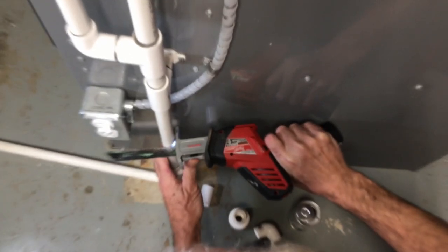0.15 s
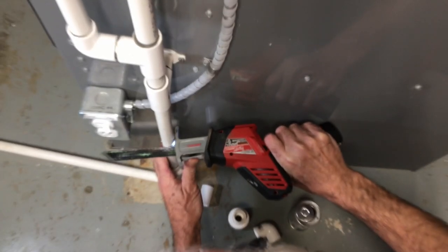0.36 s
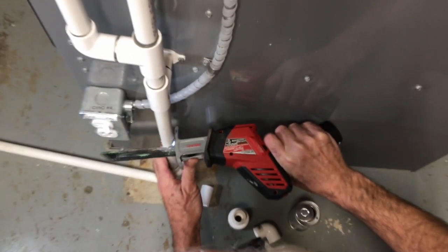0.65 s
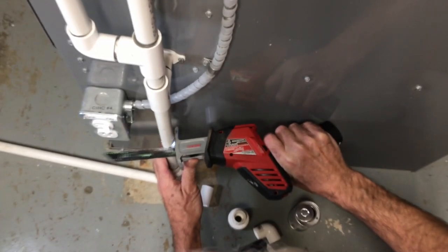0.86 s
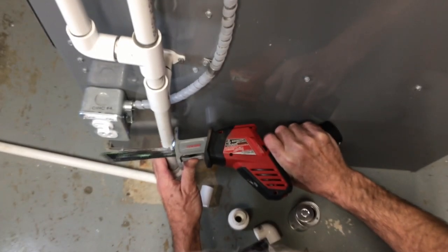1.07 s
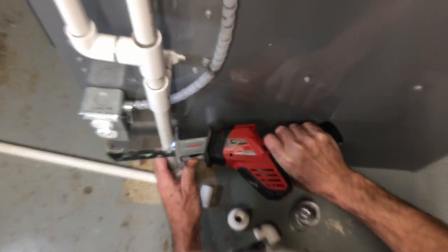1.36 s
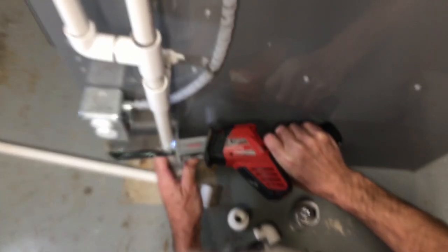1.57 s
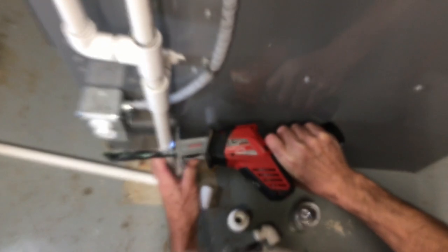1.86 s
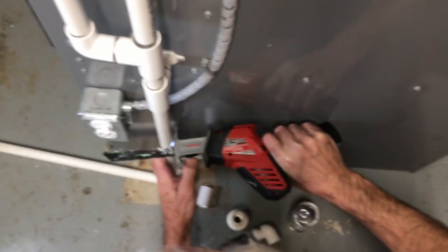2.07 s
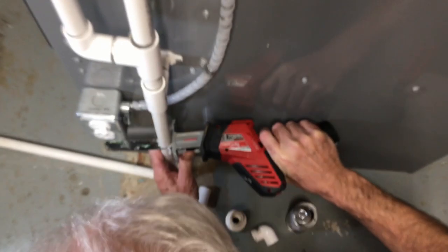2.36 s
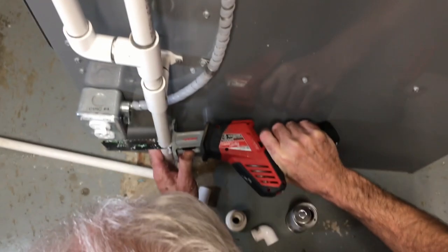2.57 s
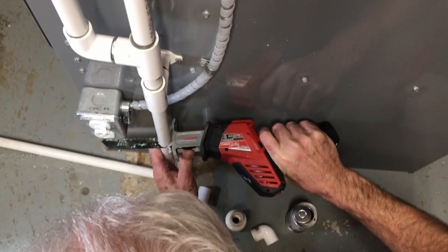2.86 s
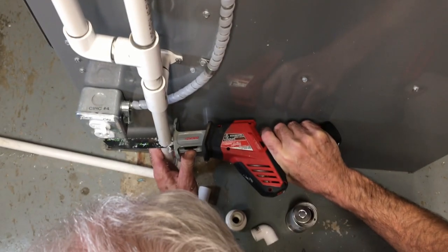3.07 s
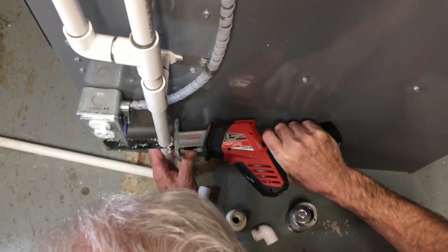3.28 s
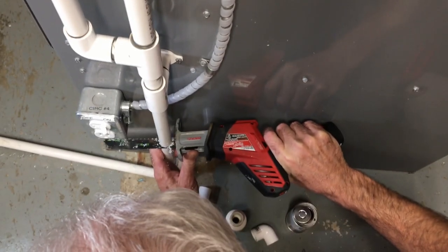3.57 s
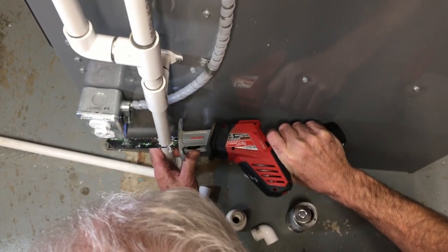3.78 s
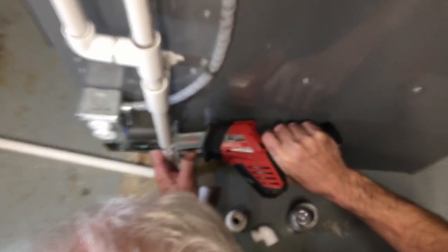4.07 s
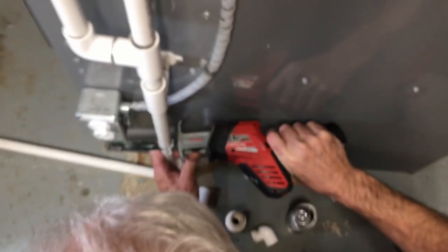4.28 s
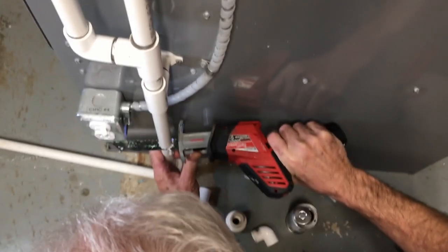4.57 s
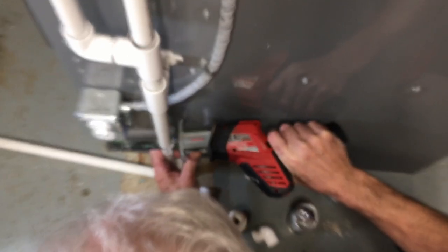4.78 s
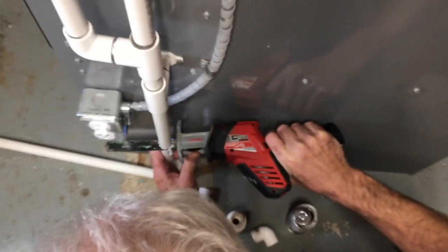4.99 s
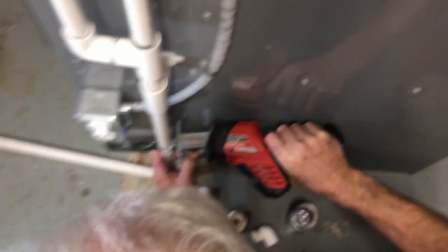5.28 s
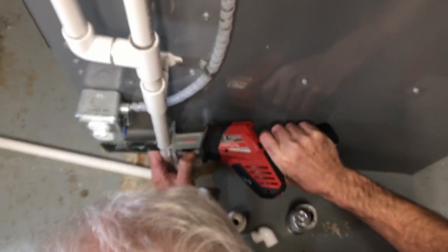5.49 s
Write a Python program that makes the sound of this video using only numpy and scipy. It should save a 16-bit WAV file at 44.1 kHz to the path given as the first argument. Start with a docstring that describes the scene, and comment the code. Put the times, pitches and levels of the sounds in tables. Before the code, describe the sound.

After a thin electric whine and a clack, a cordless reciprocating saw speeds up and cuts a plastic pipe for about two seconds, then makes four short bursts. Gears rattle, the blade rasps, squeals and knocks rapidly, the hollow pipe honks and a sheet-metal cabinet booms low. In the pauses come faint trigger clicks, blade bumps and brief whines. It sounds close, in a small hard room.

```python
"""A thin whine and a clack, then a cordless reciprocating saw speeds up and cuts a plastic pipe:
one long run, then four short bursts, beside a sheet-metal cabinet in a small hard room.
Gears rattle, the blade rasps, squeals and knocks at each reversal, the pipe honks, the cabinet booms.
The speed controller whines when the motor crawls, and the drive clacks as it takes up its slack.
Between runs the trigger clicks and the resting blade slides in the slot and bumps the pipe."""
import sys
import numpy as np
from scipy import signal
from scipy.fft import rfft, irfft
from scipy.io import wavfile

SR = 44100
rng = np.random.default_rng(int(sys.argv[2]) if len(sys.argv) > 2 else 0)


def store_wav(level_fs):
    """Save 16-bit WAV to argv[1]."""
    pcm = np.round(np.clip(np.atleast_2d(level_fs), -1, 1) * 32767)
    wavfile.write(sys.argv[1], SR, pcm.T.astype(np.int16))


N = 248283
T = np.arange(N) / SR


def from_db(db):
    """Decibels to gain."""
    return 10 ** (np.asarray(db) / 20)


def unit_rms(x, where=slice(None)):
    """Scales to rms 1 over the chosen samples."""
    return x / np.sqrt(np.mean(x[where] ** 2) + 1e-20)


def at_hz(points, hz):
    """Reads a table on a log-frequency axis."""
    points = np.array(points)
    return np.interp(np.log(np.maximum(hz, 1)), np.log(points[:, 0]), points[:, 1])


def noise():
    """Fresh white noise."""
    return rng.standard_normal(N)


def convolve(x, response):
    """Plays a sound through an impulse response."""
    return signal.fftconvolve(x, response)[:N]


def colour(x, spectrum, modes=(), size=8192):
    """Body filter of unit energy: a smooth spectrum plus resonances, rolled off below its first point."""
    hz = np.fft.rfftfreq(size, 1 / SR)
    db = at_hz(spectrum, hz) - 10 * np.log10(1 + (spectrum[0][0] / (hz + 1)) ** 4)
    for centre_hz, width_hz, lift_db in modes:
        db = db + lift_db / (1 + (2 * (hz - centre_hz) / width_hz) ** 2)
    cepstrum = irfft(np.log(from_db(db)))
    cepstrum[1:size // 2] *= 2  # fold to minimum phase
    cepstrum[size // 2 + 1:] = 0
    response = irfft(np.exp(rfft(cepstrum)))
    return convolve(x, response / np.linalg.norm(response))


def fade(clicks, decay_s):
    """Each click starts an exponential decay of its own height."""
    return signal.lfilter([1], [1, -np.exp(-1 / (decay_s * SR))], clicks + 1e-18)


def lag(x, lag_s):
    """One-pole smoothing at unity gain."""
    return fade(x, lag_s) / (lag_s * SR)


def wobble(drift_s):
    """Random drift of rms 1."""
    return unit_rms(fade(noise(), drift_s))


def passes(phase, spread_db):
    """A click of uneven strength each time the phase passes a whole number."""
    crossed = np.diff(np.floor(phase), prepend=np.floor(phase[0])) > 0
    return crossed * from_db(spread_db * np.clip(noise(), -2, 2))


def gates(rows, edge_s):
    """Soft-edged gain from rows of start_s, end_s, level_db."""
    return sum(from_db(db) * np.clip(np.minimum(T - start, end - T) / edge_s + .5, 0, 1)
               for start, end, db in rows)


# Trigger pulls: press_s, squeeze_s, rise_s, ease_s, release_s, top_speed_hz, crank_start_turns,
# drive_db, pipe_db, bite_share
PULLS = [(0, .1, .006, 1.799, 2.04, 17.76, .075, -29.4, -31.7, .92),
         (2.314, 2.314, .001, 2.333, 2.428, 26.2, .63, -26.5, -33.5, .35),
         (3.92, 3.953, .01, 4.145, 4.335, 24.26, .934, -28.2, -31.3, .25),
         (4.612, 4.612, .022, 4.792, 4.945, 23.67, .935, -29.5, -32.7, .08),
         (5.0, 5.035, .088, 5.335, 5.512, 19.1, .18, -29.9, -30.5, .35)]

def trigger():
    """Trigger travel, 0-1: barely pressed, squeezed home, held, eased back, released."""
    return sum(np.interp(T, [squeeze_s, squeeze_s + rise_s, ease_s, release_s],
                         [CRAWL_SHARE, 1, 1, CRAWL_SHARE]) * (T >= press_s) * (T < release_s)
               for press_s, squeeze_s, rise_s, ease_s, release_s, *_ in PULLS)


def latest_pull(name):
    """One column of the latest trigger pull, per sample."""
    names = ["press_s", "squeeze_s", "rise_s", "ease_s", "release_s", "top_speed_hz",
             "crank_start_turns", "drive_db", "pipe_db", "bite_share"]
    columns = dict(zip(names, np.transpose(PULLS)))
    return columns[name][np.maximum(np.searchsorted(columns["press_s"], T, "right") - 1, 0)]


CRAWL_SHARE, FULL_BATTERY_SPEED_HZ = .24, 26.5

def motor(inertia_s=.0323, sag_per_s=.0102):
    """Follows the trigger with inertia and slows under load; pace is its share of top speed."""
    press_s = latest_pull("press_s")
    pace = lag(trigger(), inertia_s)
    speed_hz = pace * latest_pull("top_speed_hz") * (1 - sag_per_s * (T - press_s))
    turns = np.cumsum(speed_hz) / SR
    crank_turns = latest_pull("crank_start_turns") + turns - np.interp(press_s, T, turns)
    return pace, speed_hz, crank_turns


# Brief controller whines, lingering as the motor coasts or sounding alone: start_s, end_s, level_db
WHINE_SPANS = [(2.03, 2.074, -49), (3.335, 3.378, -52.5), (4.945, 5.0, -49), (5.61, 5.64, -50)]
# Whine partials: harmonic_number, level_db
WHINE_PARTIALS = [(1, -7), (2, -2), (3, -2), (4, -11), (5, -12), (6, -12), (7, -12)]

def whine(switching_hz=1997.5):
    """Chopped battery current makes the windings sing, most with the trigger barely pressed."""
    duty = np.clip(trigger() * latest_pull("top_speed_hz") / FULL_BATTERY_SPEED_HZ, 0, 1)
    level = from_db(-47.5) * (duty > 0) * (1 - duty) ** .7 + gates(WHINE_SPANS, edge_s=.01)
    phase = 2 * np.pi * switching_hz * T + .11 * wobble(.012)
    partials = sum(from_db(db + 2.1 * wobble(.015)) * np.sin(harmonic * phase)
                   for harmonic, db in WHINE_PARTIALS)
    return lag(level, .012) * partials


# Background air: freq_hz, density_db
AIR_SPECTRUM = [(12, -20), (20, -4), (182, 0), (388, -15), (698, -9), (1150, -23.5), (1910, -23),
                (2390, -26.5), (6010, -25), (7520, -24), (16000, -26)]

def air():
    """Faint, steady, low air noise."""
    return from_db(-73.5) * colour(noise(), AIR_SPECTRUM)


# Saw resonances: centre_hz, width_hz, lift_db
SAW_MODES = [(1254.5, 16, 10.5), (1490, 49, 4.5), (2058, 80, 4.5), (3740, 260, 1.5), (4710, 58, 4.5),
             (5370, 44, 4.5), (5400, 74, 2.5), (13300, 200, -0.5)]
# Gear rattle: freq_hz, density_db
GEAR_SPECTRUM = [(650, -40), (1100, -10), (1240, -4), (1540, -12), (2040, 0.5), (2250, -15), (2920, -6),
                 (3260, -18.5), (3770, -6), (4130, -11), (4670, -6), (5770, -18.5), (6830, -9),
                 (12200, -11), (16000, -24)]

def gear_rattle(mesh, running):
    """Each gear mesh sends a tiny burst through the saw's body."""
    return unit_rms(colour(noise() * (mesh + .4), GEAR_SPECTRUM, SAW_MODES), running)


# Teeth on plastic: freq_hz, density_db
TEETH_SPECTRUM = [(650, -24.5), (1100, -4.5), (1350, -3), (1930, 0.5), (2250, -10), (2550, -0.5),
                  (3190, -17.5), (3810, -1), (4170, -7), (5580, -3.5), (6910, -11), (9240, -8.5),
                  (11200, -5.5), (13700, -11.5), (16000, -25.5)]

def teeth_rasp(stroke, running):
    """Teeth tear off chips, most in mid-stroke."""
    chips = noise() * from_db(1.9 * noise()) * (.71 + .25 * np.abs(stroke))
    return unit_rms(colour(chips, TEETH_SPECTRUM, SAW_MODES), running)


# Pipe honk: freq_hz, density_db
HONK_SPECTRUM = [(330, -20.5), (430, -5), (480, -4), (560, 0), (680, -2), (930, 0), (1050, -4.5),
                 (1200, -17.5), (1700, -43)]
# Pipe resonances: centre_hz, width_hz, lift_db
PIPE_MODES = [(440, 21, 4.3), (565, 40, 6.5), (790, 63, 3.6), (893, 17, 1.5)]
# Pipe growl: freq_hz, density_db
GROWL_SPECTRUM = [(240, -12), (300, -1), (350, -1), (400, -16), (700, -42)]

def pipe_honk(mesh, knocks, bite, running):
    """The hollow pipe honks with the rasp and the jolts, and growls when the teeth bite."""
    jolts = unit_rms(noise() * fade(knocks, .0066), running)
    shaking = noise() * (mesh + 1.2) + .46 * jolts
    honk = unit_rms(colour(shaking, HONK_SPECTRUM, PIPE_MODES), running)
    growl = unit_rms(colour(jolts + .6 * noise(), GROWL_SPECTRUM), running)
    return from_db(-.09) * honk + from_db(-8) * bite * growl


# Cabinet boom: freq_hz, density_db
CABINET_SPECTRUM = [(20, -5.5), (34, -8), (48, -12.5), (75, -9.5), (105, -2.5), (130, -2.5), (160, -1),
                    (205, -1), (290, -2.5), (380, -14), (550, -44)]
# Sheet-metal resonances: centre_hz, width_hz, lift_db
CABINET_MODES = [(164.8, 14, 5.7), (255.7, 9.8, 5), (282, 6.2, 2.65)]

def cabinet_boom(reversals, running):
    """Every blade reversal shoves the sheet metal."""
    shudder = unit_rms(noise() * fade(reversals, .011), running)
    shoves = unit_rms(reversals, running) + 1.06 * shudder + .5 * noise()
    return from_db(-5) * unit_rms(colour(shoves, CABINET_SPECTRUM, CABINET_MODES), running)


# Cabinet thump: freq_hz, density_db
THUMP_SPECTRUM = [(25, -22.5), (60, -6.5), (110, -2.5), (165, 2.5), (260, -5.5), (350, -21), (600, -3),
                  (900, -40)]

def thump(clicks, decay_s):
    """The cabinet answers a contact with a low thud."""
    return colour(noise() * fade(clicks, decay_s), THUMP_SPECTRUM)


def contacts(rows, spectrum, decay_s, split_hz, thump_decay_s):
    """Short crunches, with separate levels below and above the split, that thump the cabinet."""
    start_s, db, treble_db, thump_db = np.transpose(rows)
    clicks = np.zeros((3, N))
    clicks[:, np.round(start_s * SR).astype(int)] = from_db([db, db + treble_db, db + thump_db])
    body, treble = (colour(noise() * fade(c, decay_s), spectrum) for c in clicks[:2])
    body = signal.sosfilt(signal.butter(3, split_hz, "low", fs=SR, output="sos"), body)
    treble = signal.sosfilt(signal.butter(3, split_hz, "high", fs=SR, output="sos"), treble)
    return body + treble + from_db(-6.5) * thump(clicks[2], thump_decay_s)


# Drive clacks and single loud blade-reversal knocks: start_s, level_db, treble_offset_db, thump_offset_db
CLACKS = [(.0505, -32, -21, -5), (.124, -35, 6, -4), (1.296, -30, 6, -14), (1.901, -27, 5, -12),
          (1.9075, -21, 3, -1.5), (2.3155, -13, -1, -6), (2.344, -21, 1.5, -10), (2.455, -26.5, -5, -14),
          (3.3085, -19.7, -3, -12), (3.333, -35, -2.5, -2), (3.596, -43.5, -17, -9), (3.928, -25, -7, -14),
          (3.967, -34, -2, 4), (4.063, -21.5, -4, -3.5), (4.6135, -17.5, -6, -11), (5.0035, -28, -2, -5.5),
          (5.083, -29, 1, -6), (5.183, -23, 5, -1), (5.528, -22, 2, -1), (5.615, -30.5, -8, -16)]
# One clack: freq_hz, density_db
CLACK_SPECTRUM = [(100, -11.5), (300, 2.5), (420, -2), (750, 6), (1300, -6), (1950, 2.5), (2400, -5),
                  (3000, 1.5), (4000, -4.5), (5500, -9), (7000, -5.5), (11000, -2), (16000, -12.5)]

def clacks():
    """The drive clacks as it takes up its slack, and now and then a blade reversal knocks out loud."""
    return contacts(CLACKS, CLACK_SPECTRUM, decay_s=.006, split_hz=4300, thump_decay_s=.036)


# Yoke knock: freq_hz, density_db
KNOCK_SPECTRUM = [(500, -27), (1500, -9.5), (3000, -4), (5000, -2.5), (8500, -7.5), (11000, 2),
                  (13500, 0.5), (16000, -14.5)]

def yoke_knock(knocks, running):
    """The yoke strikes at both ends of the stroke."""
    return unit_rms(colour(noise() * fade(knocks, .007), KNOCK_SPECTRUM), running)


def blade_squeal(turns, running, pitch_hz=3800, wander_hz=55):
    """The blade squeals once on every fast pull through the slot."""
    phase = 2 * np.pi * np.cumsum(pitch_hz + wander_hz * wobble(.0016)) / SR
    pull = np.maximum(np.sin(2 * np.pi * (turns + .04)), 0) * running
    return unit_rms(pull * np.sin(phase) * from_db(1.2 * wobble(.003)), running)


# Cabinet shake as the hand leans on the saw: time_s, level_db
LEAN = [(.15, -38.5), (.45, -43.5), (.53, -35), (1.3, -36), (1.45, -30.5), (1.9, -29), (2.4, -28.5),
        (4.05, -30.5), (4.8, -30.8), (5.15, -32.5), (5.45, -29)]

def saw(meshes_per_turn=23, mean_lean_db=-33):
    """The crank works gears, blade, pipe and cabinet; each grows louder with speed."""
    pace, speed_hz, turns = motor()
    running = speed_hz > 12
    bite = np.clip(latest_pull("bite_share"), 0, 1)
    strain = 1 + 4 * lag(np.maximum(trigger() - pace, 0), .05)  # louder while speeding up
    stroke = np.sin(2 * np.pi * turns)  # positive on the pull
    reversals = passes(2 * turns, spread_db=1)
    slack = np.maximum(pace, CRAWL_SHARE) ** -.45  # slow strokes knock more freely
    knocks = reversals * from_db(np.where(stroke >= 0, 0, -2.5)) * slack
    knock = yoke_knock(knocks, running)
    mesh = unit_rms(fade(passes(meshes_per_turn * turns, spread_db=6), .0012), running)
    idling = from_db(-1) * gear_rattle(mesh, running) * strain + from_db(-13.5) * knock
    rasp = from_db(-3.5) * teeth_rasp(stroke, running)
    cutting = rasp + from_db(-10.5) * blade_squeal(turns, running) + from_db(-6) * knock
    drive = np.sqrt(bite) * cutting + np.sqrt(1 - bite) * idling
    lean_db = np.interp(T, *np.transpose(LEAN))
    pipe_db = latest_pull("pipe_db") + .33 * (lean_db - mean_lean_db)
    return (from_db(latest_pull("drive_db")) * pace ** 1.1 * drive
            + from_db(pipe_db) * pace ** .7 * np.sqrt(strain) * pipe_honk(mesh, knocks, bite, running)
            + from_db(lean_db) * pace ** .29 * cabinet_boom(reversals, running))


# Trigger and handling clicks: start_s, level_db, treble_offset_db, thump_offset_db
TAPS = [(2.076, -52.5, 13, -2), (2.519, -44, -13, -2), (3.270, -48, 7, 0), (3.381, -44.5, 7.5, -5),
        (3.561, -63, -5, -3), (3.806, -48.5, 9, -12), (3.899, -50.5, 8, 1.5), (4.544, -39.5, -5, -5),
        (4.592, -43, -12.5, 2.5)]
# One click: freq_hz, density_db
TAP_SPECTRUM = [(150, -7), (550, 3.5), (880, 8), (1300, -10.5), (2000, -2.5), (2400, -12), (2900, 0.5),
                (3400, -19.5), (4000, -4.5), (5200, -29.5), (6800, -13), (15000, -31.5)]

def taps():
    """The hand clicks the trigger and shifts on the saw."""
    return contacts(TAPS, TAP_SPECTRUM, decay_s=.0065, split_hz=3500, thump_decay_s=.028)


# Blade slides: start_s, end_s, squeak_db, rasp_db
SLIDES = [(2.1, 2.225, -71, -68), (2.225, 2.3, -80, -77), (3.72, 3.785, -66, -77)]
# Slide squeak: freq_hz, density_db
SQUEAK_SPECTRUM = [(500, 17), (1500, -12.5), (5000, -18), (7500, 6.5), (10500, -9.5), (15000, -10)]
# Squeak resonances: centre_hz, width_hz, lift_db
SQUEAK_MODES = [(7500, 500, 7), (8950, 350, 8)]

def blade_slides():
    """The resting blade is drawn along the slot: a thin squeak and a soft rasp of the teeth."""
    rows = np.array(SLIDES)
    friction = noise() * from_db(1.8 * wobble(.005))
    squeak = gates(rows[:, [0, 1, 2]], edge_s=.022) * colour(friction, SQUEAK_SPECTRUM, SQUEAK_MODES)
    rasp = gates(rows[:, [0, 1, 3]], edge_s=.022) * colour(friction, TEETH_SPECTRUM, SAW_MODES)
    return squeak + rasp


# Blade bumps on the pipe: start_s, level_db, thump_offset_db
BUMPS = [(2.513, -44, 6), (2.660, -50, -9), (2.830, -63, -2), (3.102, -69.5, -11), (3.270, -52, -14),
         (3.419, -50, 5), (3.596, -49, -9), (3.712, -71, 28), (4.400, -46, -2)]
# Struck pipe: pitch_hz, level_db, t60_s
PIPE_RING = [(565, -13, .06), (760, -4, .045), (880, 2, .04), (985, -2, .04), (1270, -19, .03),
             (2600, -23, .015), (3950, -14, .02), (7000, -24, .008)]

def blade_bumps():
    """Light touches ring the pipe and thump the cabinet."""
    start_s, db, thump_db = np.transpose(BUMPS)
    clicks = np.zeros((2, N))
    clicks[:, np.round(start_s * SR).astype(int)] = from_db([db, db + thump_db])
    ring = sum(from_db(level_db - 60 * T / t60_s) * np.sin(2 * np.pi * pitch_hz * T)
               for pitch_hz, level_db, t60_s in PIPE_RING)
    return convolve(clicks[0], ring) + from_db(-2.5) * thump(clicks[1], decay_s=.019)


# Room and cabinet decay: freq_hz, t60_s
ROOM_DECAY = [(60, 1.5), (130, 0.86), (240, 0.34), (450, 0.33), (2000, 0.15), (12000, 0.08)]

def room(x, wet_db, boom_db):
    """Adds a diffuse tail that dies band by band; the bass lingers in the sheet metal."""
    t = T[:int(1.3 * SR)]
    onset = np.clip((t - .002) / .0091, 0, 1)
    edges_hz = np.geomspace(30, 17000, 13)
    tail = 0
    for low, high in zip(edges_hz, edges_hz[1:]):
        hz = np.sqrt(low * high)
        envelope = onset * from_db(-60 * t / at_hz(ROOM_DECAY, hz))
        bandpass = signal.butter(2, [low, high], "band", fs=SR, output="sos")
        band = signal.sosfilt(bandpass, rng.standard_normal(len(t))) * envelope
        gain = np.sqrt(2 * (high - low) / SR) * from_db(wet_db + boom_db / (1 + (hz / 300) ** 2))
        tail = tail + gain * band / np.linalg.norm(band)
    return x + convolve(x, tail)


def scene():
    """Saw and handling in the room, plus dry whine and air; mono."""
    handling = clacks() + taps()
    background = air()
    work = saw() + handling + blade_bumps() + blade_slides()
    return (room(work, wet_db=-12.5, boom_db=18.5) + whine() + background)[None]


def record(dry):
    """Steep low-pass on the top treble."""
    cutoff_hz = 16100
    return signal.sosfilt(signal.ellip(10, .2, 80, cutoff_hz, fs=SR, output="sos"), dry)


dry = scene()
out = record(dry)
store_wav(out)
```